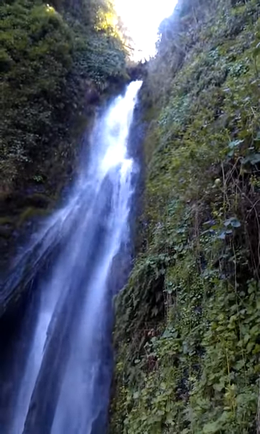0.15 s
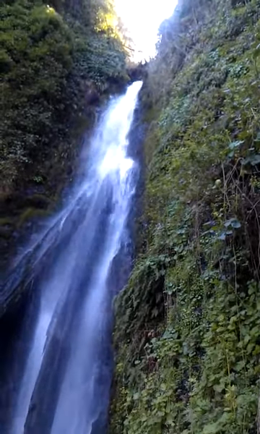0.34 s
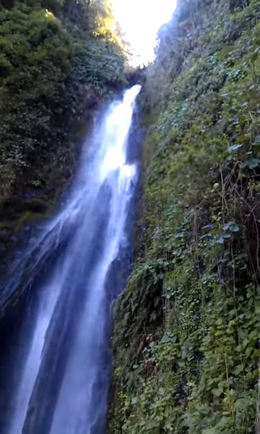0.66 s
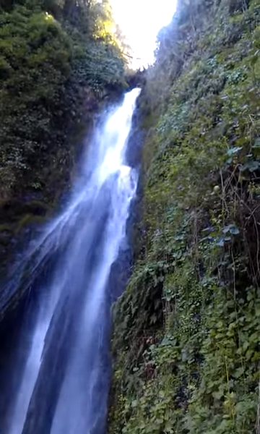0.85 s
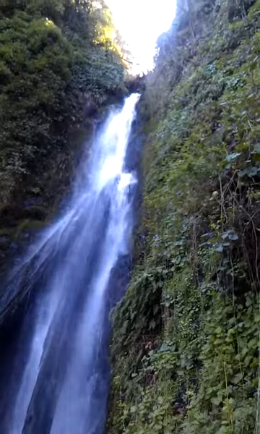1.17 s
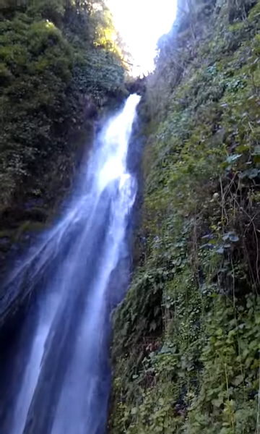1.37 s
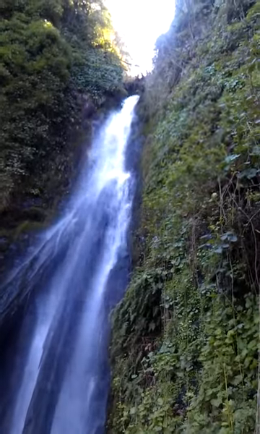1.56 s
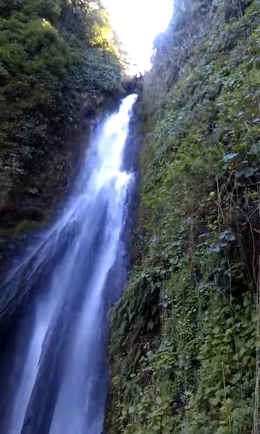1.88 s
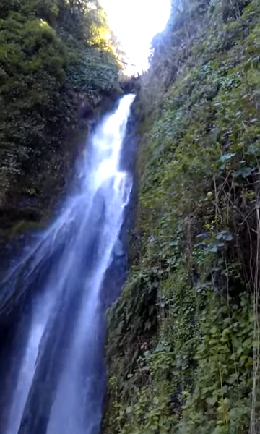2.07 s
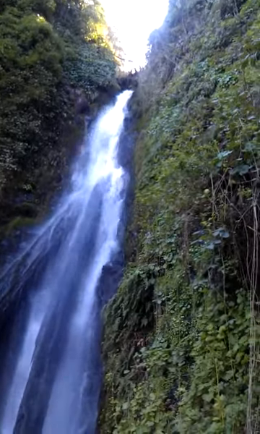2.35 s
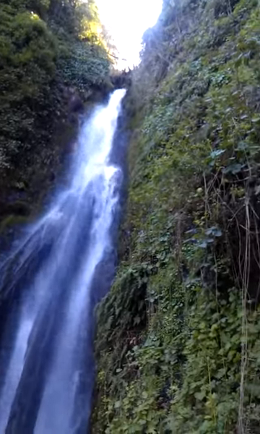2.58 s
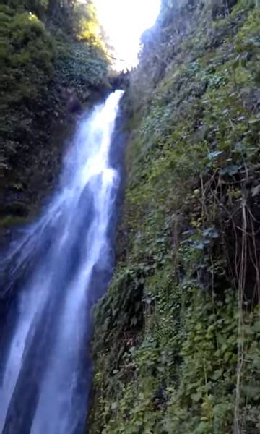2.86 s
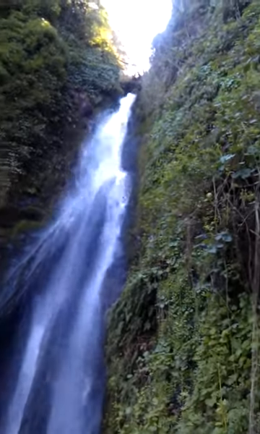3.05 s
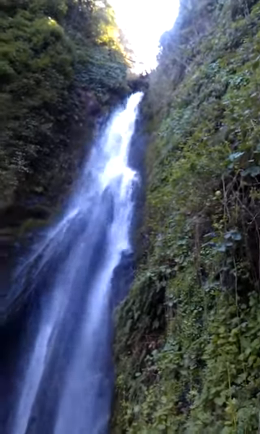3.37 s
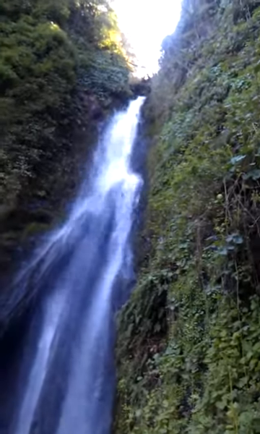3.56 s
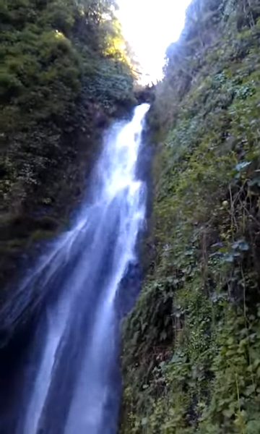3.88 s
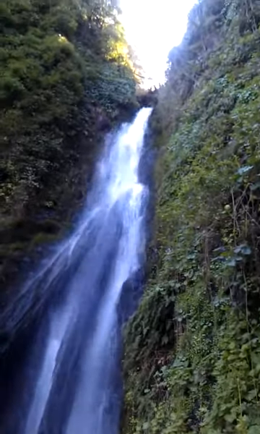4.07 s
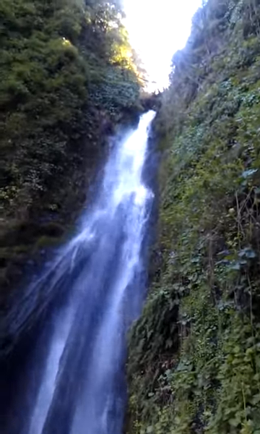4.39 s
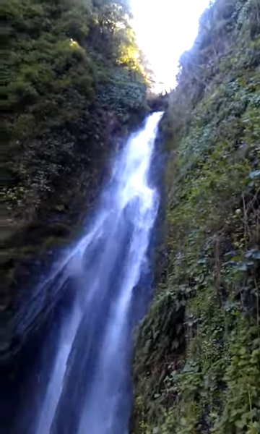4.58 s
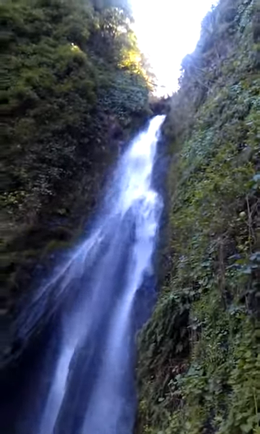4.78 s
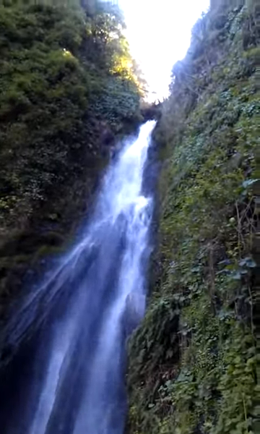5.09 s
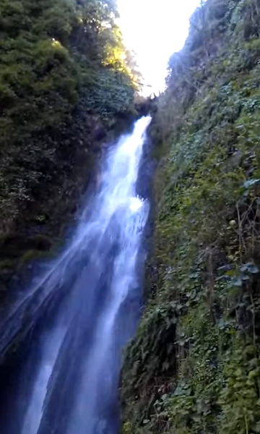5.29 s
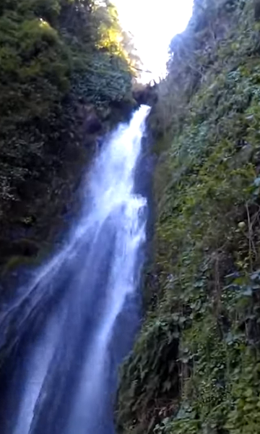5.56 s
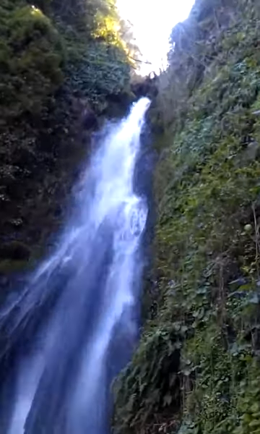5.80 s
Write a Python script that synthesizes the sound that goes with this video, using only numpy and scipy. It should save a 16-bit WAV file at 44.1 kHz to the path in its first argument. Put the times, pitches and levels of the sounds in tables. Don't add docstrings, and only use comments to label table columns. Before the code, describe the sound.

Continuous falling water outdoors, even and noisy like broadband hiss, with only slight surges. It starts shaded and resonant in the upper middle, then brightens in two smooth steps near 2.3 and 3.3 seconds. The thin single microphone gives almost no low end, and compression makes the treble watery and patchy, with brief wide flecks.

```python
import sys
import numpy as np
from scipy import signal
from scipy.io import wavfile
from scipy.ndimage import uniform_filter1d

SR = 44100
rng = np.random.default_rng(int(sys.argv[2]) if len(sys.argv) > 2 else 0)


def master(y):
    cut = np.clip(np.atleast_2d(y).T, -1, 1)
    pcm = np.round(cut * 32767)
    wavfile.write(sys.argv[1], SR, pcm.astype(np.int16))


def attenuation_scalar(level_db):
    decades = np.asarray(level_db, float) / 20
    return 10 ** decades


N = 261513

# (frequency [Hz], level [dB])
BASS_COLOUR = [(20, -93), (40, -92), (60, -83.5), (90, -81), (140, -62), (200, -60), (300, -57.5),
               (420, -60), (600, -52)]
# (frequency [Hz], level [dB])
CUPPED_COLOUR = [(600, -53), (850, -54.5), (1200, -52), (1500, -52), (2400, -45.5), (2900, -48),
                 (4200, -57.5), (5500, -64), (6300, -70), (7800, -56.5), (10400, -61.5), (12500, -62.5),
                 (13800, -69.5), (15600, -71.5)]
# (frequency [Hz], level [dB])
HALF_OFF_COLOUR = [(600, -54.5), (1100, -52), (1600, -51), (2500, -49), (3300, -51.5), (4100, -60),
                   (5600, -60.5), (6500, -56.5), (8500, -62.5), (10500, -60.5), (11700, -64), (13000, -63),
                   (13800, -65.5), (15600, -69)]
# (frequency [Hz], level [dB])
OPEN_COLOUR = [(600, -54), (1150, -51), (1800, -56), (2350, -53), (3500, -53), (4300, -56), (5200, -52),
               (5800, -55), (6600, -56), (8200, -57), (10800, -59), (12000, -66.5), (14000, -68),
               (15600, -67.5)]
# (time [s], position [steps])
HAND_PATH = [
    (0, 0.15),
    (0.9, 0.1),
    (1.55, -0.05),
    (2.15, 0.088),
    (2.45, 0.86),
    (3.2, 1.1),
    (3.45, 1.8),
    (4.0, 1.63),
    (5.93, 1.65),
]
# (frequency [Hz], lead
# [s])
TREBLE_LEAD = [(2400, 0.084), (3800, 0.075), (6000, 0.21), (8000, 0.076), (12000, -0.15)]
# (time [s], spray level [dB])
FLOW_SURGES = [
    (0, -0.2),
    (1.5, -0.8),
    (2, -0.3),
    (3, -0.8),
    (3.5, -2),
    (4, -1),
    (5.2, 0.2),
    (5.6, -0.8),
    (5.93, 0.3),
]
# (time [s], depth [dB], half length [s])
PALM_ECHO = [
    (2.2, -4.5, 0.11),
    (3.28, -4, 0.27),
]
# (frequency [Hz], level [dB])
ROUNDING_STEP = [(30, -50), (200, -26), (700, -12), (2500, -4), (4500, 3), (6300, 6.5), (8500, 6),
                 (10500, 8), (12500, 9.5), (15500, 10)]
LINE_HZ = (np.arange(1024) + 0.5) * SR / 2048
CAMERA_EDGE_HZ = 15740


def read(points, at):
    f, value = np.transpose(points)
    return np.interp(np.log(at + 1), np.log(f + 1), value)


def evened(x):
    return x / np.sqrt(np.mean(x ** 2) + 1e-20)


def smoothed(x, blocks, lines):
    return uniform_filter1d(uniform_filter1d(x, size=blocks, axis=0), size=lines, axis=1)


def palm_notch_db(t, hz):
    start_s, start_hz, slide_hz_per_s, width_hz = 2.05, 6200, 2200, 440
    off = (hz - start_hz + slide_hz_per_s * (t[:, None] - start_s)) / width_hz
    depth_db = sum(db * np.exp(-((t - s) / half_s) ** 2) for s, db, half_s in PALM_ECHO)
    return depth_db[:, None] / (1 + off ** 2)


def hand_colour_db(t, hz):
    hand = np.interp(t[:, None] + read(TREBLE_LEAD, hz), *np.transpose(HAND_PATH))
    colours = CUPPED_COLOUR, HALF_OFF_COLOUR, OPEN_COLOUR
    cupped, half, free = (read(BASS_COLOUR[:-1] + list(s), hz) for s in colours)
    first_step = np.minimum(hand, 1) * (half - cupped)
    second_step = np.clip(hand - 1, 0, 1) * (free - half)
    return palm_notch_db(t, hz) + cupped + first_step + second_step


def waterfall(patchy_db=0.3, flicker_db=0.45, ripple_db=0.6):
    level_db, spray_hz = 10, 4400
    body_db, body_follows = -1.0, -0.12
    frames, hz = N // 512 + 5, np.fft.rfftfreq(2048, 1 / SR)
    t = np.arange(frames) * 512 / SR
    real, imaginary, patches, ripple = rng.standard_normal((4, frames, len(hz)))
    patches = evened(smoothed(patches, 7, 32))
    ripple = evened(smoothed(ripple, 90, 10))
    flicker = evened(uniform_filter1d(rng.standard_normal(frames), size=2))[:, None]
    flow_db = np.interp(t, *np.transpose(FLOW_SURGES))
    spray = 1 / (1 + (spray_hz / (hz + 1)) ** 2)
    surge_db = np.outer(body_db + body_follows * flow_db, 1 - spray) + np.outer(flow_db, spray)
    texture_db = patchy_db * patches + spray * (flicker_db * flicker + ripple_db * ripple)
    field_db = hand_colour_db(t, hz) + surge_db + texture_db
    spectra = (real + 1j * imaginary) * attenuation_scalar(field_db)
    return attenuation_scalar(level_db) * signal.istft(spectra.T, nperseg=2048, noverlap=1536)[1][:N]


def lapped_cosines():
    n, k = np.arange(2048)[:, None] + 0.5, np.arange(1024) + 0.5
    window = np.sin(np.pi * n / 2048)
    return window * np.cos(np.pi / 1024 * (n + 512) * k) / np.sqrt(512)


def to_lines(x, start):
    halves = np.pad(x, (2048 - start, 3072 - (N - start) % 1024)).reshape(-1, 1024)
    return np.hstack([halves[:-1], halves[1:]]) @ lapped_cosines()


def from_lines(lines, start):
    blocks = lines @ lapped_cosines().T
    return (blocks[1:, :1024] + blocks[:-1, 1024:]).ravel()[1024 - start:][:N]


def camera_rounding(x, wobble_db=0.45, strain=0.6, most_db=10.3):
    lines = to_lines(x, 984)
    masker_db = 10 * np.log10(abs(smoothed(lines ** 2, 7, 140)) + 1e-12)
    wobble = evened(uniform_filter1d(rng.standard_normal((len(lines), 32)), size=6, axis=0))
    wobble = wobble_db * np.repeat(wobble, 32, axis=1)
    load_db = masker_db[:, 150:600].mean(axis=1)
    load_db = (load_db - np.median(load_db)).clip(-4, 4)
    strain_db = strain * np.outer(load_db, (LINE_HZ / CAMERA_EDGE_HZ) ** 2)
    step_db = masker_db + read(ROUNDING_STEP, LINE_HZ) + wobble + strain_db
    own_db = 10 * np.log10(abs(smoothed(lines ** 2, 3, 32)) + 1e-12)
    step = attenuation_scalar(np.minimum(step_db, own_db + most_db + wobble))
    whole = np.floor((abs(lines) / step) ** 0.75 + 0.4054) * (LINE_HZ < CAMERA_EDGE_HZ)
    return from_lines(np.sign(lines) * whole ** (4 / 3) * step, 984)


def noise_fill(x, fill_db=0.0):
    fills_per_s, fills_more_per_hand = 2.2, 1.6
    low_edge_hz, spread_oct, width_oct = 4130, 0.7, 0.31
    ears = np.array([to_lines(x, 499)] * 2)
    t = np.arange(ears.shape[1]) * 1024 / SR
    when, height = rng.random((len(t), 2)).T
    hand = np.interp(t, *np.transpose(HAND_PATH))
    chance = (fills_per_s + fills_more_per_hand * hand) * 1024 / SR
    noise = rng.uniform(-1, 1, ears.shape) * np.sqrt(3)
    for block in np.flatnonzero(when < chance):
        low_hz = low_edge_hz * 2 ** (-spread_oct * np.log(1 - 0.92 * height[block]))
        band = (LINE_HZ > low_hz) & (LINE_HZ < low_hz * 2 ** width_oct)
        band_rms = np.std(ears[0, block, band])
        ears[:, block, band] = attenuation_scalar(fill_db) * band_rms * noise[:, block, band]
    return np.array([from_lines(ear, 499) for ear in ears])


def scene():
    return np.array([waterfall()] * 2)


def band_limit(x):
    return signal.sosfilt(signal.butter(12, 15880, fs=SR, output="sos"), x)


def record(dry):
    edge = signal.firwin(801, 15780, window=("kaiser", 11), fs=SR)
    band_limited = signal.oaconvolve(camera_rounding(dry[0]), edge, "same")
    return band_limit(noise_fill(band_limited))


dry = scene()
out = record(dry)
master(out)
```